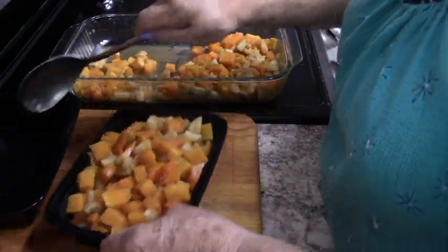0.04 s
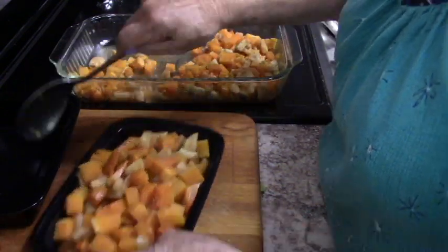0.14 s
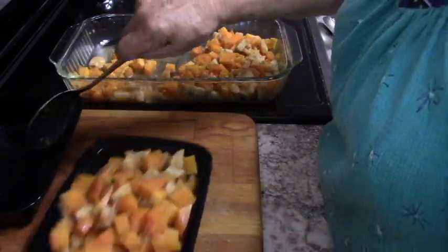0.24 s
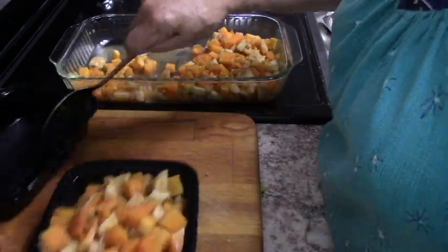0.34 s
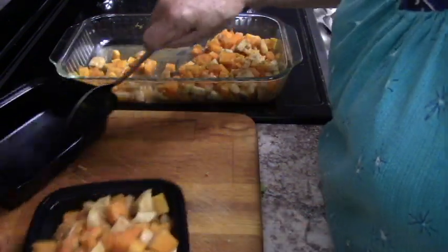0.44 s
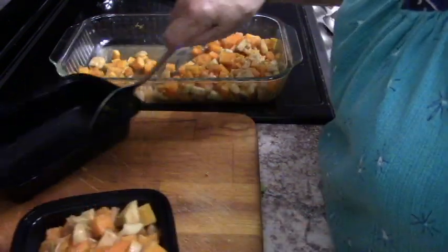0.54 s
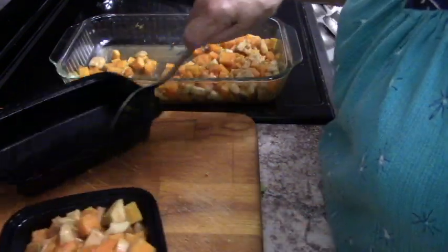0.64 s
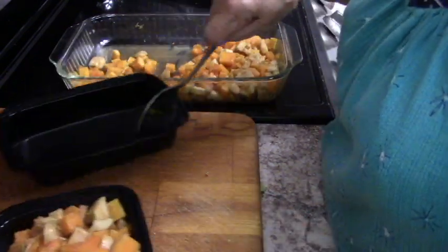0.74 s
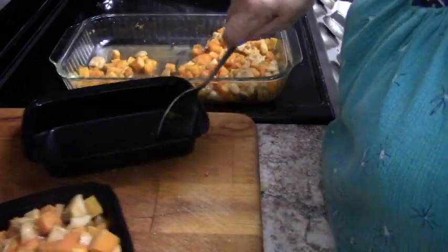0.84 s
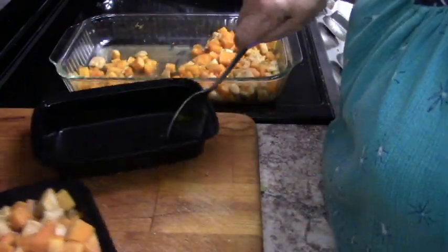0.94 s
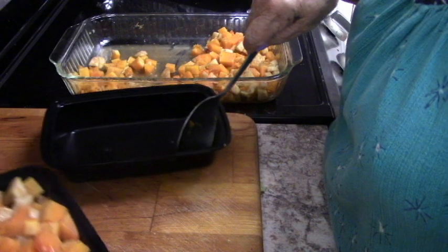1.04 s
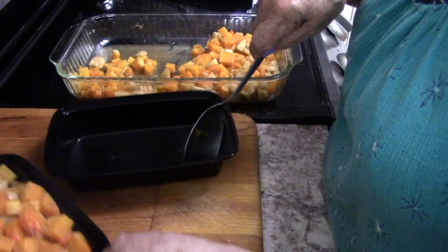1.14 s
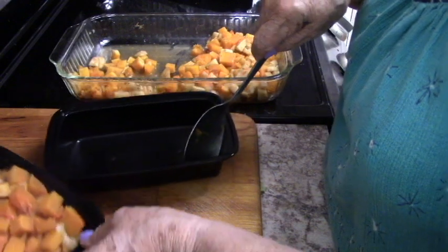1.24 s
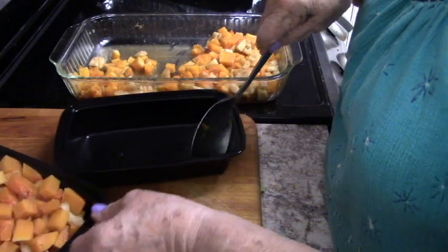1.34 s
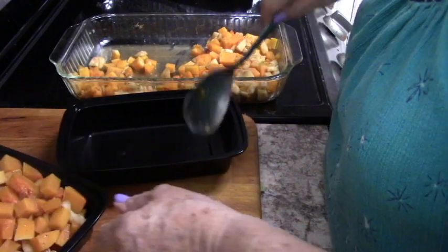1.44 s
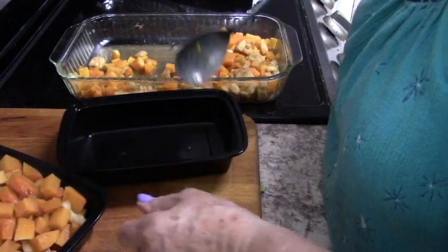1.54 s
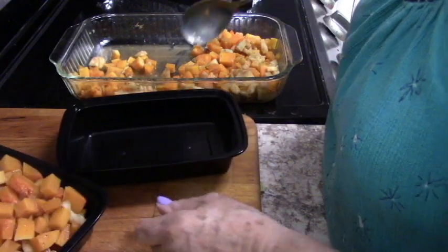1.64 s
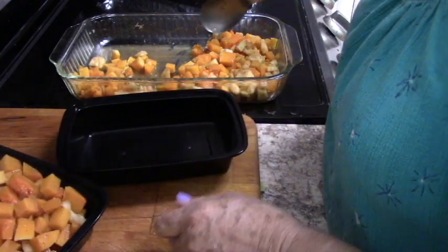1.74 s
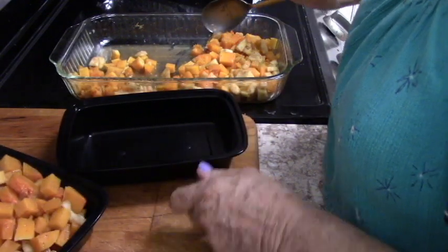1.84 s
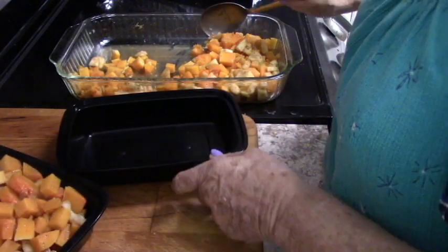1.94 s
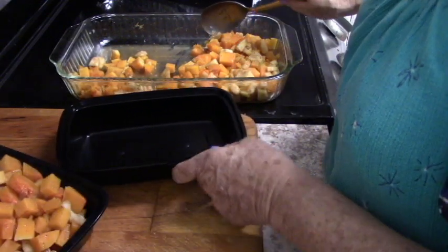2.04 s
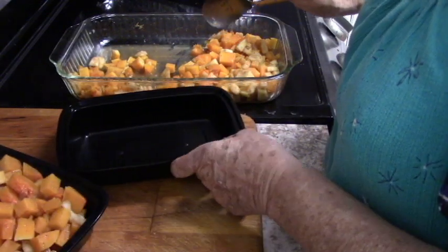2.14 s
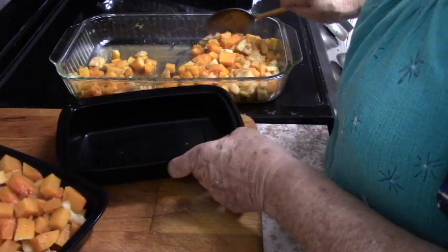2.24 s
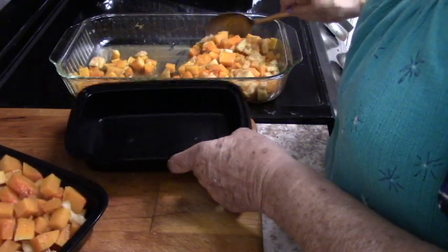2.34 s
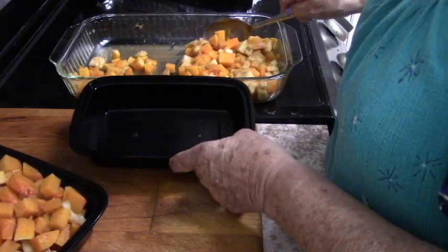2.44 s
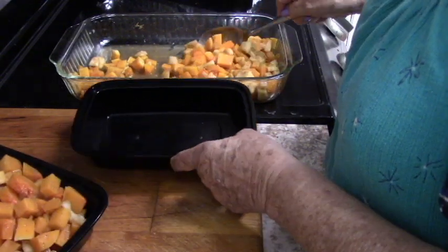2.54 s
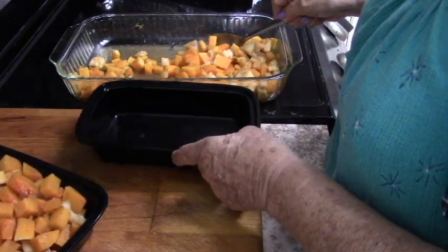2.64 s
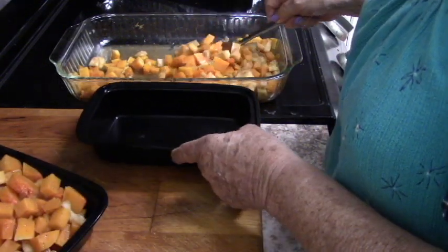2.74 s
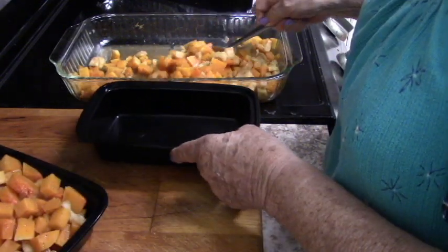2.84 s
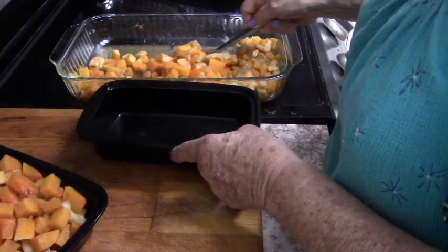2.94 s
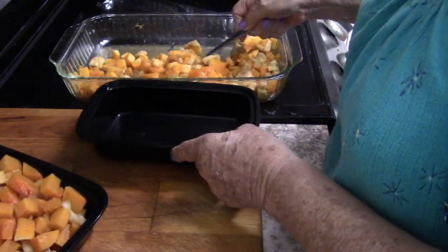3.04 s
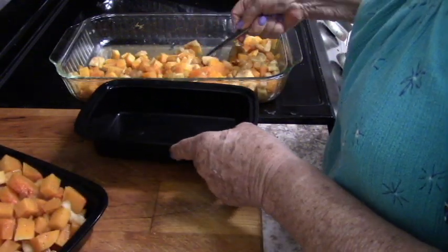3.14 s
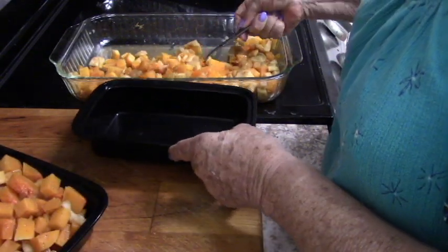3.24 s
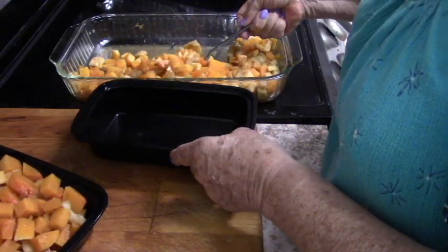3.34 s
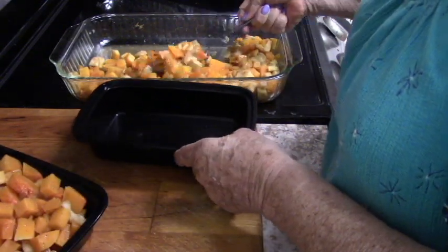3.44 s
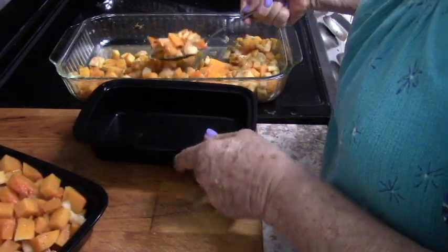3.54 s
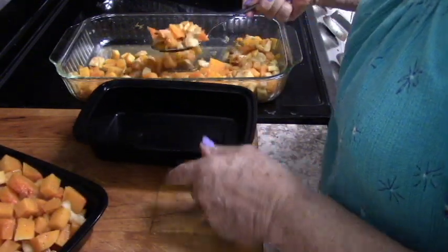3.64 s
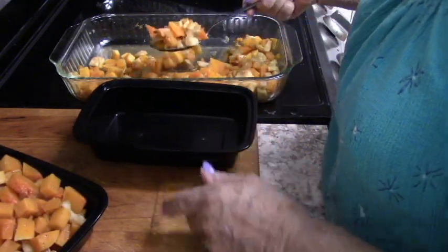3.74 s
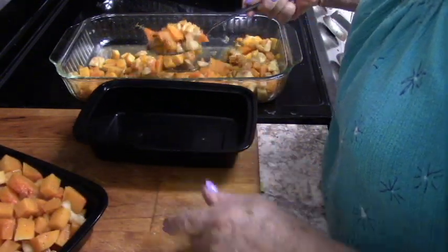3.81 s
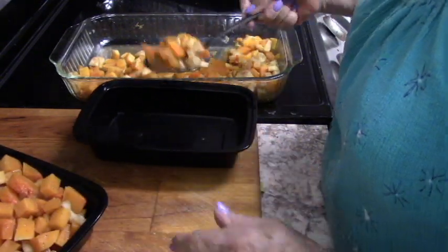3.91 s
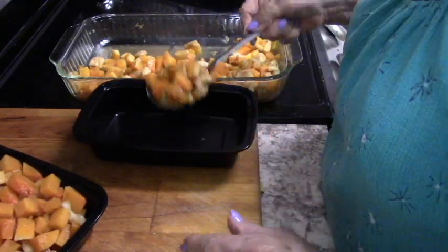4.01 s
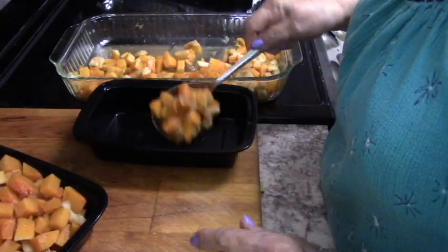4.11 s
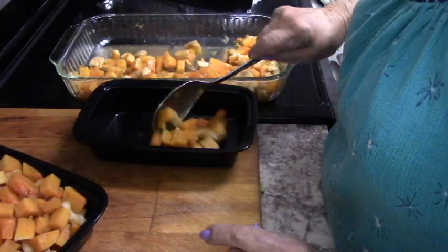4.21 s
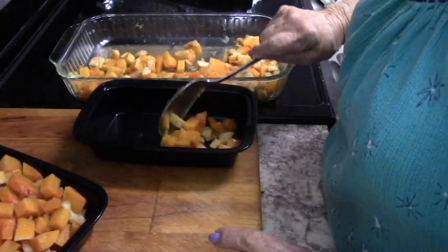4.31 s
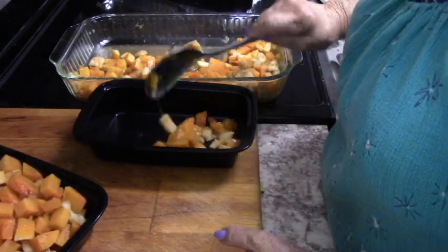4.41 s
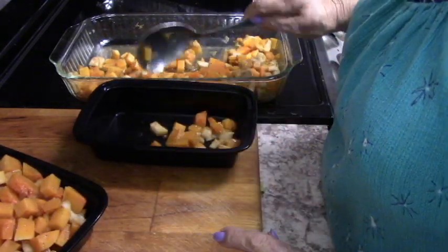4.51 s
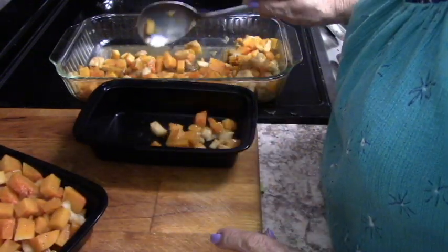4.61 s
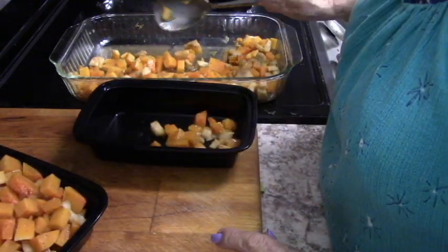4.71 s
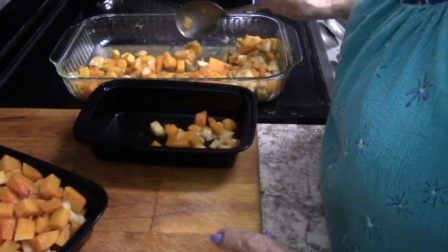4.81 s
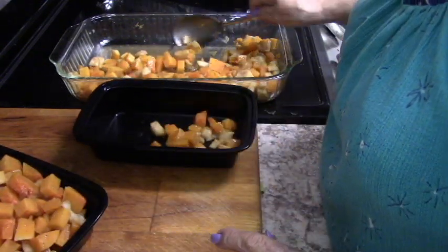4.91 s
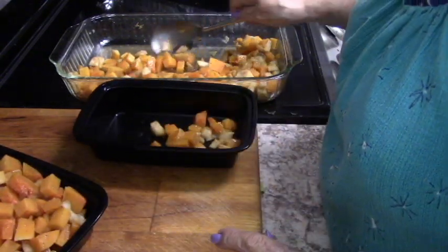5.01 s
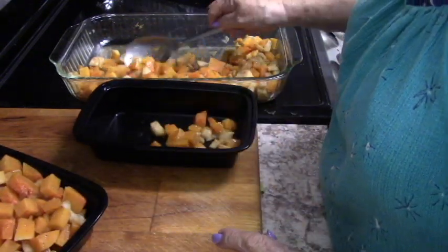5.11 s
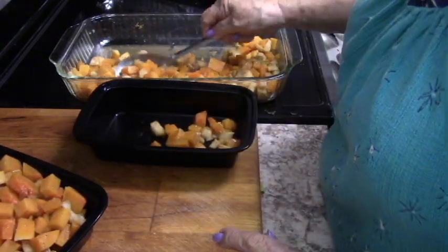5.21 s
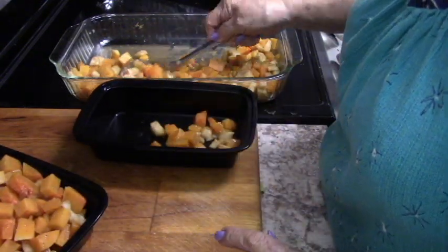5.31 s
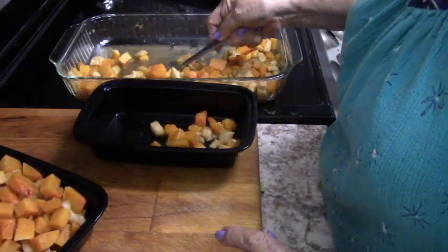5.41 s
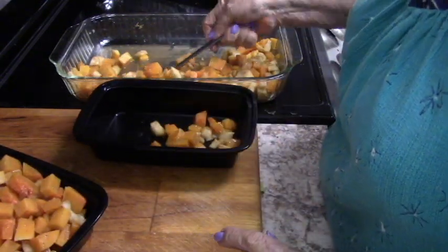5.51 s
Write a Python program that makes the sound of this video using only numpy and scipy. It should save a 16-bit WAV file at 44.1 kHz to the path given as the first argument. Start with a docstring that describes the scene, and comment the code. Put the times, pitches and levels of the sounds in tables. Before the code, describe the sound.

A loud cluster of hollow plastic knocks opens the scene, followed by uneven scraping of trays on wood for over a second. It becomes much quieter: spoon taps on glass, tiny moist crackles, soft brushing, muffled plops of food into a plastic container, then brighter glass clinks near the end. Close stereo microphone, slightly left-leaning, in a small reflective kitchen.

```python
"""Plastic trays slide over a wooden board and knock together in a small kitchen: uneven noise and short
bursts ring tray and board, and a breathy whistle sinks in pitch. A steel spoon clinks on a glass baking dish,
heard as decaying modes with a crack; it digs through wet diced vegetables and drops them into a tray, heard
as small bursts and brushed noise. Dense short echoes surround it all, over a faint noise hiss."""
import sys
import numpy as np
from scipy import signal
from scipy.fft import rfft, irfft, next_fast_len
from scipy.io import wavfile

SR = 44100
rng = np.random.default_rng(int(sys.argv[2]) if len(sys.argv) > 2 else 0)


def boost(x):
    """Linear amplitude factor 10**(x/20) for a level x in decibels (scalar or array-like)."""
    u = np.asarray(x, float) / 20
    return 10 ** u


def output_pcm(signal):
    """Save a mono or channel-first signal as 16-bit PCM at the path in sys.argv[1].

    Samples are clipped to [-1, 1] before scaling.
    """
    pcm = np.clip(np.atleast_2d(signal).T, -1, 1) * 32767
    wavfile.write(sys.argv[1], SR, np.round(pcm).astype(np.int16))


N = 245195   # samples in the scene

# Knocks of trays on the board and the dish rocking: start_s, peak_db, centre_hz, spread_octaves
KNOCK_ROWS = [(.228, -8.5, 1660, 3.07), (.234, -5, 1700, 2.87), (0.241, -9, 1820, 5),
              (0.256, -17, 5040, 1.5), (.259, -14, 1400, 1.9), (0.266, -36, 303, 1.17),
              (.281, -22, 1580, 1.5), (0.374, -22.5, 3300, 0.56), (.378, -47, 240, 0.92),
              (0.401, -20, 1300, 2.3), (0.409, -22, 1400, 2.6), (0.67, -23, 2530, 0.68),
              (.678, -19.5, 1300, 3.07), (0.827, -19, 5630, 1.3), (1.19, -11, 5200, 1.27),
              (1.191, -19.5, 1270, 4.06), (2.204, -30, 629, .5), (2.729, -61, 169, 0.95),
              (4.939, -32, 364, 1.14), (4.938, -59, 140, 1.3), (5.114, -45.5, 505, 0.29)]
# Tray resonances: pitch_hz, width_hz, level_db
TRAY_MODES = [(508.4, 43, 14), (851, 180, -7), (1460, 20, 12), (3250, 120, -1)]
# The board's thud under a tray, one resonance: pitch_hz, width_hz, level_db
BOARD_MODE = (110, 200, -6.5)
# Trays dragged on the board: time_s, level_db, pressure_db, hollow_hz
DRAG_PATH = [(0, -43, -2, 1900), (.21, -41, -10, 2225), (.3, -42.5, -1.5, 1900), (.44, -35, -4.5, 2036),
             (.64, -46.5, 11, 1738), (0.761, -37, 4.5, 2430), (.835, -38, 9, 1900), (0.911, -42, 0, 1680),
             (1.05, -36.5, -13, 1832), (1.2, -42, -7.5, 2060), (1.358, -38, -11, 2160),
             (1.419, -42.5, 4.5, 2605), (1.451, -77, -8, 2470)]
# Pressure brings up the lows and highs, one pair each: level_at_no_pressure_db, gain_db_per_pressure_db
DRAG_LOWS_LAW = (-9, 0.42)
DRAG_HIGHS_LAW = (-2.05, 0.43)
# Relative spectrum shared by all rubbing: pitch_hz, density_db_per_hz
RUB_COLOUR = [(59, -63), (100, -44.5), (333, -13), (403, -3), (447, -17), (742, -5.5), (1520, -9.5),
              (8230, -11.5), (15500, -36)]
# Narrow resonances that ride on the hollow band's centre: pitch_ratio
HOLLOW_PITCH_RATIOS = (0.74, 0.99, 1.45)
# Whistle of the sliding tray, one glide: start_s, start_hz, end_s, end_hz
SQUEAK_GLIDE = (.5, 9350, .84, 7900)
# Spoon on dish, one row per place struck: start_s, level_db, free_ring_db, damped_t60_s (at 3 kHz), rebound_db
CLINK_ROWS = [(2.2036, -28, -13, 0.053, -33), (2.285, -20, -16, 0.043, -22.5),
              (4.935, -13.5, -14, 0.049, -8.5), (5.4043, -18.5, -18.5, 0.027, -17.5)]
# Modes of the glass dish: pitch_hz
DISH_MODES_HZ = [505, 695, 862, 1155, 1495, 1636, 1870, 1955, 2120, 2272, 2405, 2670, 3040, 3585, 3757,
                 4000, 4905, 5050, 5230, 5369, 6350, 7220, 7680, 8870, 9850, 11100, 12700]
# How strongly each place rings the dish: one row per clink, one level_db per mode
DISH_LEVELS_DB = [(-3.5, 0.5, -17.5, -10, -19, -24, -10.5, -25.5, -27.5, -7.5, -15.5, -8.5, -7.5, -13, -16, -25, -34.5, -42, -42, -38, -47, -46, -53, -42.5, -53, -39, -52),
                  (-9.5, -33.5, -22.5, -16.5, -17.5, -17, -12, -16.5, -24, -15, -23, -4.5, -16, -2.5, 1, -18, -18, -15, -6.5, -1.5, -3, 4.5, -23.5, 2.5, -3, -1.5, -26),
                  (-19, -16.5, -5, -18, -19.5, -8, -13, -12, -12, -6, -5, -9.5, -7.5, 0.5, -1.5, -13, -4.5, -16, -6, -3.5, -35, -10.5, -16, -19, -8, -6.5, -15.5),
                  (-12, -26, -23, -21, -7, -18, -30, -11, -20, -15, -9, -29, 2.5, -15, -14, -13, -34, -30, -17, -14, -14, -21, -14.5, -16.5, -22, -38, -43)]
# Small touches of spoon, food and fingers: start_s, peak_db, centre_hz, spread_octaves
TICK_ROWS = [(2.121, -43, 2980, 2.1), (2.483, -42.5, 2580, 0.8), (2.548, -50, 1290, 0.84),
             (2.726, -30.5, 830, 1.37), (2.726, -27.5, 3900, 1.76), (2.754, -37.5, 950, 2.26),
             (3.155, -40.5, 7750, 2.1), (3.452, -43, 1440, 2.1), (4.265, -38.5, 10280, 0.64),
             (4.522, -41.5, 7930, 1.7), (5.098, -37, 7900, 0.16), (5.139, -40, 7500, 0.97),
             (5.185, -46, 9300, .7), (5.205, -43, 3740, 1.4), (5.228, -43, 2340, 0.57),
             (5.259, -39, 3480, 1.2), (5.277, -42.5, 6960, 1.8), (5.372, -50, 3580, 0.82)]
# The spoon pushed softly into the food: start_s, peak_db, centre_hz, spread_octaves
PUSH_ROWS = [(2.683, -38.5, 1130, 3.8), (2.938, -39, 2270, 1.5)]
# Food pieces falling into the empty tray: start_s, peak_db, centre_hz, spread_octaves
DROP_ROWS = [(4.032, -49.5, 510, 0.72), (4.208, -33, 830, 2.03), (4.235, -45, 1210, 3.2),
             (4.293, -35, 900, 2.1), (4.307, -37, 800, 2.5), (4.299, -51, 180, 1.05),
             (4.351, -42.5, 653, 3.2), (4.399, -45, 393, 1.5), (4.482, -43.5, 1400, 2),
             (4.497, -34.5, 845, 1.5), (4.52, -43, 1170, 2.9)]
# Resonances of the empty tray: pitch_hz, width_hz, level_db
EMPTY_TRAY_MODES = [(332, 92, 5.3), (830, 72, 8.8), (1448, 93, 3.2)]
# Strokes of hand and spoon over board and food: start_s (of the hold), hold_s, level_db, fade_db_per_s, bright_db
BRUSH_ROWS = [(1.896, 0.15, -67, 150, -24), (2.098, 0.018, -52.5, 328, -1), (2.235, 0.5, -60.5, 66, -3),
              (2.95, 0.015, -61.5, 45, -7), (3.818, 0.14, -63, 69, 1), (4.187, 0.12, -65.5, 38, -2),
              (5.091, 0.075, -57, 97, -3)]
# Resonances of the brushed surface: pitch_hz, width_hz, level_db
SURFACE_MODES = [(1580, 180, -7.5), (2690, 140, 2.5), (3180, 1100, -9.5), (7880, 88, -15)]
# Kitchen echo: pitch_hz, t60_s, left_right_likeness
ECHO_DECAY = [(208, 0.7, 1), (800, 0.36, 0.87), (2020, 0.45, 0.53), (11500, 0.29, 0.098)]
# Relative spectrum of the hiss: pitch_hz, density_db_per_hz
HISS_COLOUR = [(15, -37), (25, -14.5), (140, -11.5), (198, -11), (469, -4.5), (1450, -6), (1570, -8),
               (5580, -16), (15500, -29)]

EDGES_HZ = 25 * 2 ** np.arange(0, 9.4, .5)   # half-octave bands
# Decay constant of a burst centred at 1 kHz; duller ones last longer by this power of pitch
KNOCK_MS, KNOCK_SOFTNESS = 6, 0.23
TICK_MS, TICK_SOFTNESS = 13.4, 0.76
PUSH_MS, DROP_MS = 14, 7.5   # the same constant at every pitch
HELD_LOWS_DB = -8   # until the first knock the tray is carried in the hand and barely loads the board
# The air under the rubbing object favours a broad band that moves as it tips
HOLLOW_LIFT_DB, HOLLOW_OCTAVES, HOLLOW_WIDTH_HZ = 5, 0.6, 170
SQUEAK_DB, SQUEAK_WIDTH_HZ = -46.5, 350   # level before the tone and the fade
DAMPED_BELOW_HZ = 1210   # food and the stove top soak up the low modes: the lower, the sooner they die
CLINK_RISE_S = 0.00055   # the spoon stays in contact this long, so the ring swells before it dies
REBOUND_S = 0.0075   # the spoon bounces and touches once more
FREE_T60_S = 0.21   # at 3 kHz: part of each mode rings on once the spoon has left
CLUSTER = 0.045   # the free ring is a cluster of close modes, reaching this share of its pitch to either side
CHIP_DB, CHIP_T60_S = -0.5, 0.048   # the crack, noise just above each mode's pitch
BRUSH_RISE_DB_PER_S, BRUSH_LOWS_DB, BRUSH_HOLLOW_HZ = 224.5, -3, 1900
ROOM_DB, HISS_DB = -12.5, -62


def rms_one(x):
    """Scale to unit rms."""
    return x / np.sqrt(np.mean(x ** 2) + 1e-20)


def at_hz(points, hz, column=1):
    """Read a table column on a log-frequency axis."""
    points = np.array(points)
    return np.interp(np.log(hz), np.log(points[:, 0]), points[:, column])


def band(x, low_hz, high_hz):
    """Band-pass, with its edges kept inside the usable range."""
    edges = np.clip([low_hz, high_hz], [20, 40], [SR * .4, SR * .45])
    return signal.sosfilt(signal.butter(2, edges, "band", fs=SR, output="sos"), x)


def drift(rate):
    """Slow chance with spread 1, drawn every 40 samples and joined by straight lines."""
    r = np.exp(-80 * np.pi * rate / SR)
    chance = rng.standard_normal(N // 40 + 2002)
    slow = signal.lfilter([1], [1, -2 * r, r * r], chance)[2000:]
    return np.interp(np.arange(N) / 40, np.arange(len(slow)), rms_one(slow))


def resonate(x, modes, direct_db):
    """Resonances in parallel, alternating in polarity, beside the direct sound."""
    out = boost(direct_db) * x
    for k, (hz, width_hz, db) in enumerate(modes):
        r = np.exp(-np.pi * width_hz / SR)
        top = (1 - r * r) / 2 * boost(db) * (-1) ** k
        poles = [1, -2 * r * np.cos(2 * np.pi * hz / SR), r * r]
        out = out + signal.lfilter([top, 0, -top], poles, x)
    return out


def add(out, start_s, sound, level_db, pan_db):
    """Lay a sound into the stereo scene; positive pan leans left."""
    i = round(start_s * SR)
    sound = boost(level_db) * sound[:N - i]
    out[:, i:i + len(sound)] += sound * boost(np.array([[pan_db / 2], [-pan_db / 2]]))


def touches(out, rows, body, direct_db, pan_db):
    """A contact is a dying burst of rough noise around its centre, ringing the body it lands on."""
    ms = np.arange(SR // 9) / SR * 1000
    noise = rng.standard_normal((len(rows), len(ms)))
    for (start_s, peak_db, hz, octaves, contact_ms), burst in zip(rows, noise):
        half = 2 ** (max(octaves, .1) / 2)
        burst = burst * np.exp(-ms / max(contact_ms, .2))
        burst = band(burst, hz / half, hz * half)
        burst = band(burst, hz / half ** 2, hz * half ** 2)   # steeper skirts
        burst = resonate(burst, body, direct_db)
        add(out, start_s, burst / np.abs(burst).max(), peak_db, pan_db)


def with_contact(rows, ms_at_1khz, softness=0):
    """Give each contact its decay constant; with softness, lower-pitched contacts last longer."""
    return [(*row, ms_at_1khz * (row[2] / 1000) ** -softness) for row in rows]


def tray_knocks(out):
    """Dull and bright knocks: noise bursts ring the tray and thud the board."""
    rows = with_contact(KNOCK_ROWS, KNOCK_MS, KNOCK_SOFTNESS)
    touches(out, rows, [BOARD_MODE, *TRAY_MODES], direct_db=3.0, pan_db=2.5)


def rubbing(controls, body, direct_db, grit_db, patchy_db, hollow_db):
    """Dense uneven slips ring the body; weight brings up the lows, brightness the highs."""
    level_db, weight_db, bright_db, hollow_hz = controls
    unevenness = np.minimum(rng.exponential(1, N), 4)
    slips = rng.standard_normal((2, N)) * boost(grit_db * unevenness)
    slips = resonate(slips, body, direct_db)
    zones = [0, 0, 0]   # lows, mids, highs
    for k, (low, high) in enumerate(zip(EDGES_HZ[4:], EDGES_HZ[5:])):
        hz = np.sqrt(low * high)
        zone = int(hz > 1200) + int(hz > 4300)
        lift_db = HOLLOW_LIFT_DB * np.exp(-(np.log2(hz / hollow_hz) / HOLLOW_OCTAVES) ** 2)
        band_db = at_hz(RUB_COLOUR, hz) + patchy_db * drift(16) + lift_db
        zones[zone] += band(slips[k % 2], low, high) * boost(band_db)
    lows, mids, highs = map(rms_one, zones)
    # narrow noise carried on tones makes the moving resonances
    turns = np.cumsum(hollow_hz + np.zeros(N)) / SR
    flutter = band(rng.standard_normal((len(HOLLOW_PITCH_RATIOS), N)), 20, HOLLOW_WIDTH_HZ)
    tones = np.sin(2 * np.pi * np.outer(HOLLOW_PITCH_RATIOS, turns))
    mids = mids + boost(hollow_db) * rms_one(np.sum(flutter * tones, axis=0))
    return boost(level_db) * (boost(weight_db) * lows + mids + boost(bright_db) * highs)


def drag_controls():
    """Pressing a tray down brings up the board's lows and the gritty highs together."""
    time_s, *columns = np.transpose(DRAG_PATH)
    t = np.arange(N) / SR
    level_db, pressure_db, hollow_hz = (np.interp(t, time_s, column) for column in columns)
    level_db[round(time_s[-1] * SR):] = -99   # the drag is over
    lows_db, highs_db = (db + share * pressure_db for db, share in (DRAG_LOWS_LAW, DRAG_HIGHS_LAW))
    lows_db[:round(KNOCK_ROWS[0][0] * SR)] += HELD_LOWS_DB
    return level_db, lows_db, highs_db, hollow_hz


def tray_drag():
    """Plastic rubbing on wood rings tray and board, a little to the left."""
    body = [BOARD_MODE, *TRAY_MODES]
    drag = rubbing(drag_controls(), body, direct_db=2.5, grit_db=4.5, patchy_db=2.0, hollow_db=-7.5)
    return drag * boost(np.array([[.8], [-.8]]))


def squeak():
    """A narrow band of noise carried down by a gliding tone, fading in and out."""
    start_s, high_hz, end_s, low_hz = SQUEAK_GLIDE
    way = np.clip((np.arange(N) / SR - start_s) / (end_s - start_s), 0, 1)
    turns = np.cumsum(high_hz + (low_hz - high_hz) * way) / SR
    breath = rms_one(band(rng.standard_normal(N), 20, SQUEAK_WIDTH_HZ))
    fade = np.sqrt(np.sin(np.pi * way) + 1e-12)
    return boost(SQUEAK_DB) * fade * breath * np.sin(2 * np.pi * turns)


def clinks(out):
    """Each blow rings its place's modes, spoon-damped and free; a short crack rides on the attack."""
    t = np.arange(SR // 3) / SR
    for (start_s, level_db, free_db, t60, rebound_db), place_db in zip(CLINK_ROWS, DISH_LEVELS_DB):
        twins = rng.uniform(-0.94, 1, (len(DISH_MODES_HZ), 2))
        crack, shimmer = rng.standard_normal((2, len(t)))
        sound = 0
        for hz, mode_db, (detune, share) in zip(DISH_MODES_HZ, place_db, twins):
            # modes come in close pairs
            twin = .5 * share * np.sin(2 * np.pi * hz * (1 + .01 * detune) * t)
            pair = np.sin(2 * np.pi * hz * t) + twin
            lasting = (hz / 3000) ** -.25 * min(hz / DAMPED_BELOW_HZ, 1)
            ring = np.sign(detune) * pair * boost(-60 * t / (t60 * lasting))
            cluster = rms_one(band(shimmer, hz / (1 + CLUSTER), hz * (1 + CLUSTER)))
            free = cluster * boost(free_db - 60 * t / (FREE_T60_S * lasting))
            chip = band(crack * boost(CHIP_DB - 60 * t / CHIP_T60_S), hz * 1.1, hz / 0.64)
            chip = band(chip, hz / 2, hz * 2)
            sound = sound + boost(mode_db) * (ring + free + chip)
        sound = sound * np.minimum(t / CLINK_RISE_S, 1)
        sound = sound + boost(rebound_db) * np.interp(t - REBOUND_S, t, sound, left=0)
        sound = band(band(sound, 220.0, SR), 230, SR)   # a dish is too small to radiate bass
        add(out, start_s, sound, level_db, pan_db=2.0)


def wet_crackle(count=32):
    """Wet pieces part and settle with tiny snaps at random while the spoon works in the food."""
    when, size, pitch = rng.random((count, 3)).T
    return [(2.4 + 3 * a, -60 + 6.7 * b, 1500 * 8 ** c, .8, 2.5) for a, b, c in zip(when, size, pitch)]


def small_touches(out):
    """Light contacts and wet snaps as short bursts, coloured by the brushed surface."""
    rows = with_contact(TICK_ROWS, TICK_MS, TICK_SOFTNESS) + wet_crackle()
    touches(out, rows, SURFACE_MODES, direct_db=-6.0, pan_db=2.5)


def spoon_pushes(out):
    """Soft pushes into food: bursts that are mostly direct sound, with little ring."""
    touches(out, with_contact(PUSH_ROWS, PUSH_MS), SURFACE_MODES, direct_db=12.0, pan_db=3.0)


def food_drops(out):
    """Falling pieces ring the hollow of the empty tray."""
    touches(out, with_contact(DROP_ROWS, DROP_MS), EMPTY_TRAY_MODES, direct_db=-4.5, pan_db=2.5)


def brush_controls():
    """Each stroke rises, holds and fades; the loudest one at any moment sets level and brightness."""
    start, hold, db, fade, bright_db = np.transpose(BRUSH_ROWS)[:, :, None]
    t = np.arange(N) / SR - start
    rise_db = BRUSH_RISE_DB_PER_S * np.maximum(-t, 0)
    fade_db = fade * np.maximum(t - hold, 0)
    strokes_db = db - rise_db - fade_db
    brightness_db = bright_db[strokes_db.argmax(axis=0), 0]
    return strokes_db.max(axis=0), BRUSH_LOWS_DB, brightness_db, BRUSH_HOLLOW_HZ


def brush_strokes():
    """Hand and spoon rub over board and food as patchy noise ringing the surface."""
    return rubbing(brush_controls(), SURFACE_MODES, direct_db=-8.0, grit_db=1.5, patchy_db=5.0,
                   hollow_db=-9.0)


def kitchen(x):
    """Dense echoes off near walls: noise that builds up in a few ms and dies band by band."""
    t = np.arange(SR // 2) / SR
    white, echo = rng.standard_normal((2, 2, len(t))), 0
    for k, (low, high) in enumerate(zip(EDGES_HZ[2:], EDGES_HZ[3:])):
        hz = np.sqrt(low * high)
        mid, side = band(white[k % 2], low, high) * boost(-60 * t / at_hz(ECHO_DECAY, hz))
        alike = np.clip(at_hz(ECHO_DECAY, hz, column=2), 0, 1)
        echo = echo + np.sqrt(1 + alike) * mid + np.sqrt(1 - alike) * side * [[1], [-1]]
    echo = echo * np.minimum(t / 0.011, 1) ** 2
    echo = echo / np.sqrt(np.sum(echo ** 2) / 2)
    return signal.fftconvolve(x[None], echo, axes=1)[:, :N]


def hiss():
    """Room and microphone noise, unrelated left and right, each band drifting slightly."""
    out, white = 0, rng.standard_normal((2, 2, N))
    for k, (low, high) in enumerate(zip(EDGES_HZ, EDGES_HZ[1:])):
        band_db = at_hz(HISS_COLOUR, np.sqrt(low * high)) + 0.81 * drift(14.0)
        out = out + band(white[k % 2], low, high) * boost(band_db)
    return boost(HISS_DB) * rms_one(out)


def scene():
    """Hits and rubbing close to the microphone, their echo, and the hiss."""
    near = np.zeros((2, N))
    tray_knocks(near)
    near += tray_drag() + squeak()
    clinks(near)
    small_touches(near)
    spoon_pushes(near)
    food_drops(near)
    near += brush_strokes()
    return near + boost(ROOM_DB) * kitchen(near.mean(axis=0)) + hiss()


def band_limit(x):
    """A steep low-pass at the top of the band."""
    return signal.sosfilt(signal.butter(12, 16850, fs=SR, output="sos"), x)


def record(dry):
    """Two close microphone ports, the right reached a little later; dull at the top."""
    size = next_fast_len(N)
    hz = np.fft.rfftfreq(size, 1 / SR)
    lag_s = np.array([[0], [.000014]])
    lag = np.exp(-2j * np.pi * hz * lag_s)
    top = 1 / np.sqrt(1 + (hz / 11000) ** 8.7) / np.sqrt(1 + (hz / 15500) ** 24)
    mix = irfft(rfft(dry, size) * lag * top, size)[:, :N]
    return band_limit(mix)


dry = scene()
out = record(dry)
output_pcm(out)
```